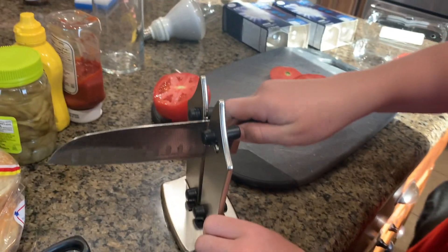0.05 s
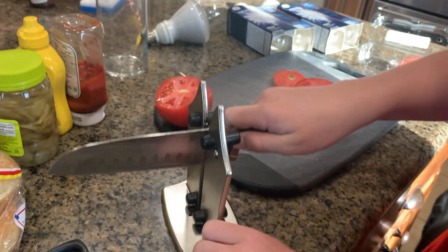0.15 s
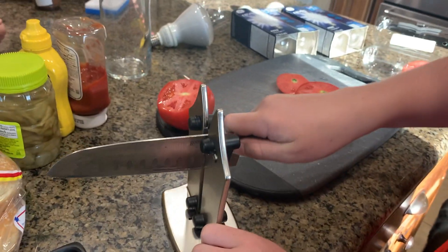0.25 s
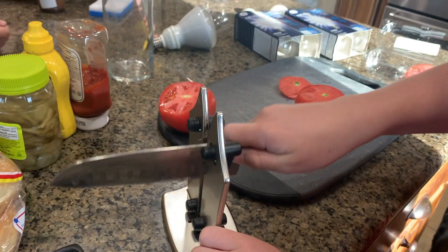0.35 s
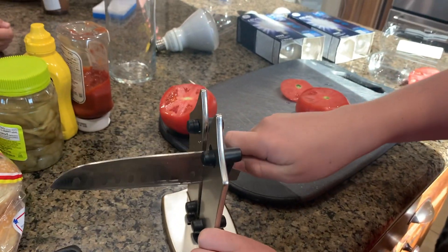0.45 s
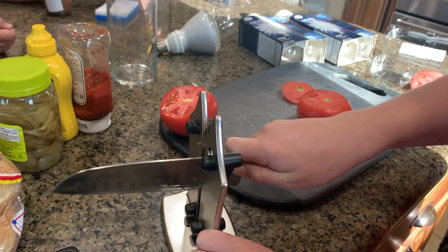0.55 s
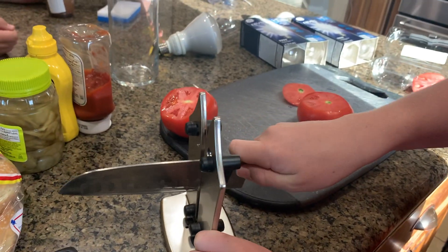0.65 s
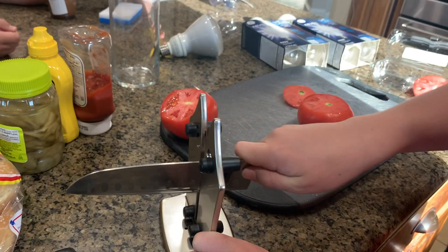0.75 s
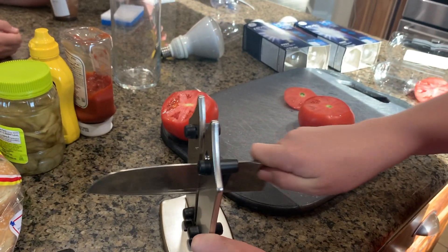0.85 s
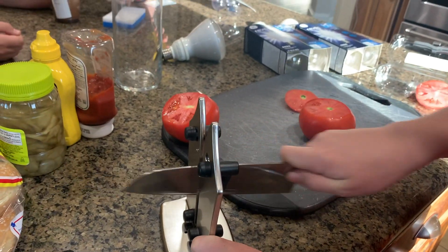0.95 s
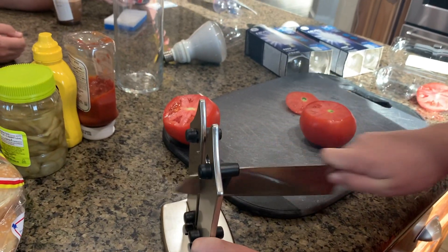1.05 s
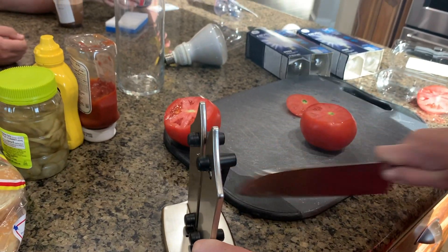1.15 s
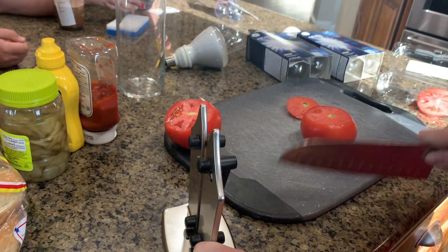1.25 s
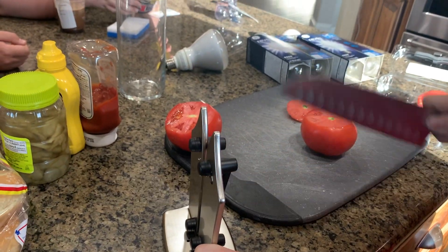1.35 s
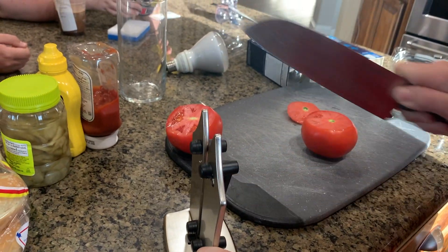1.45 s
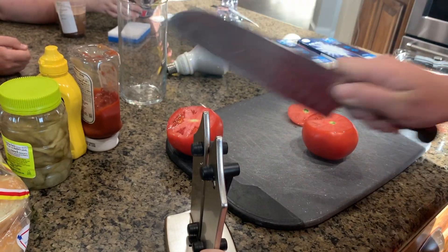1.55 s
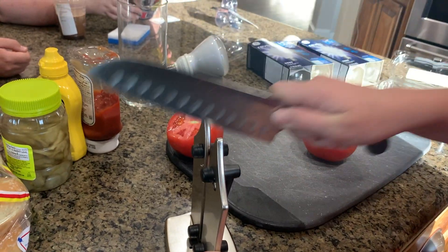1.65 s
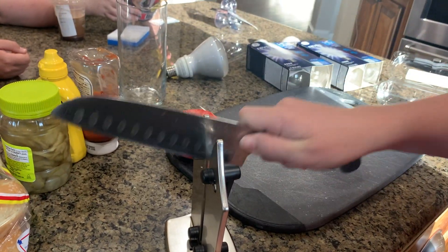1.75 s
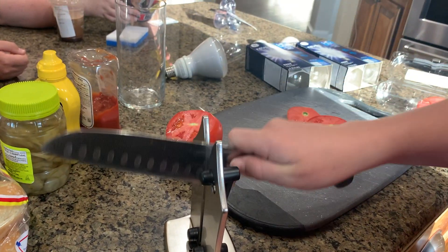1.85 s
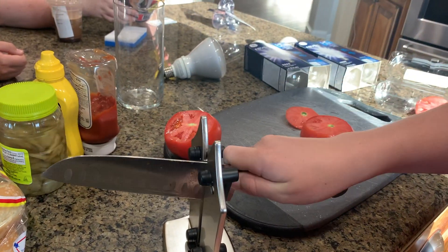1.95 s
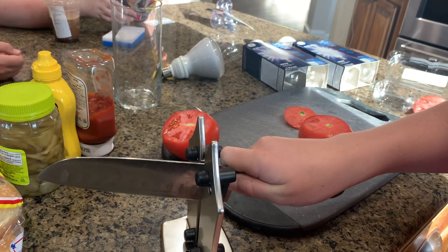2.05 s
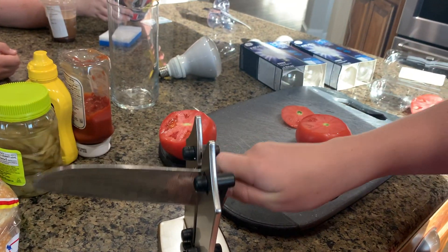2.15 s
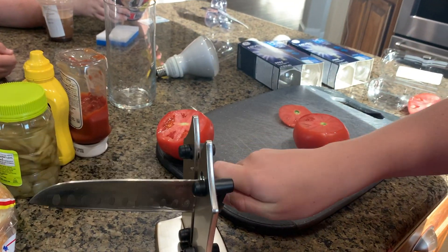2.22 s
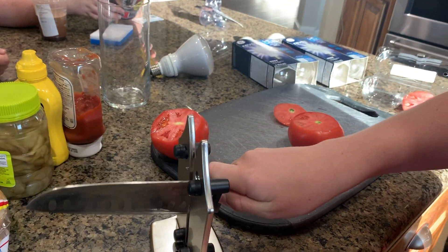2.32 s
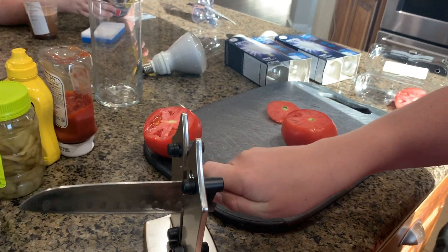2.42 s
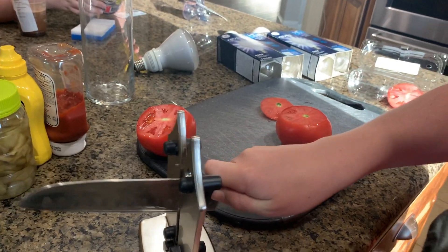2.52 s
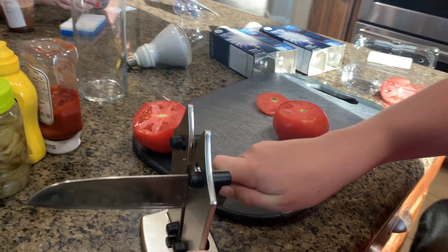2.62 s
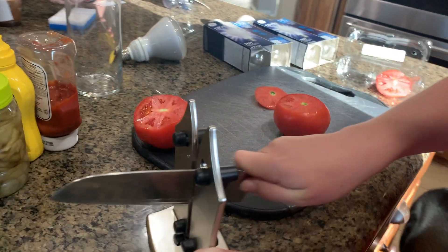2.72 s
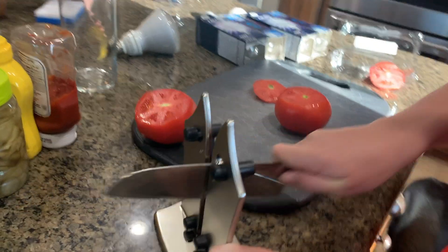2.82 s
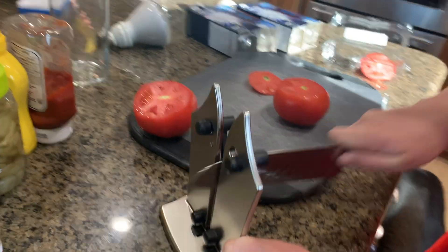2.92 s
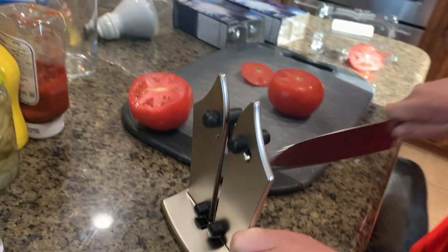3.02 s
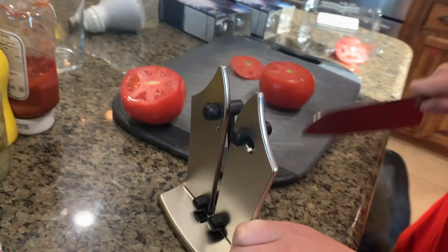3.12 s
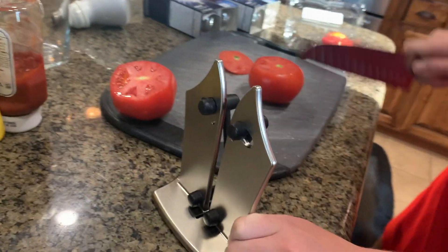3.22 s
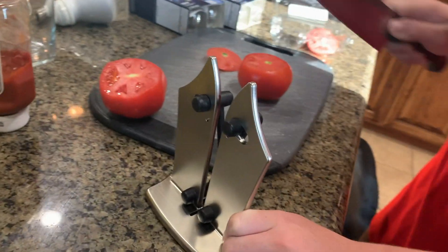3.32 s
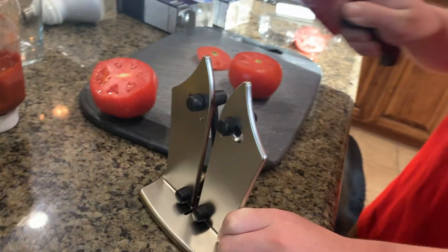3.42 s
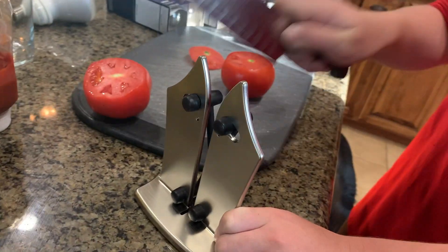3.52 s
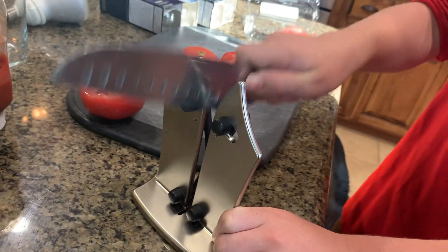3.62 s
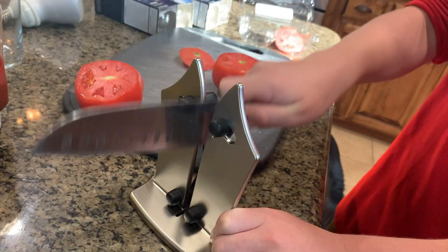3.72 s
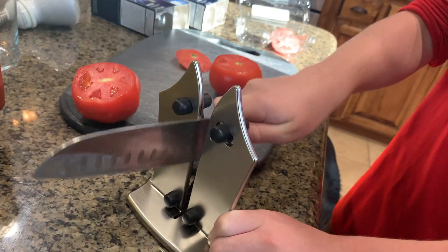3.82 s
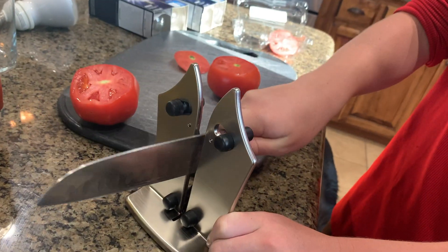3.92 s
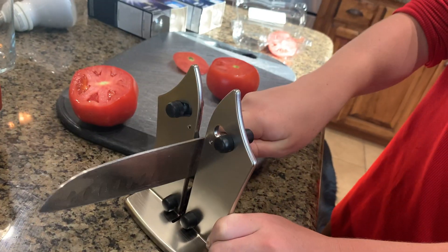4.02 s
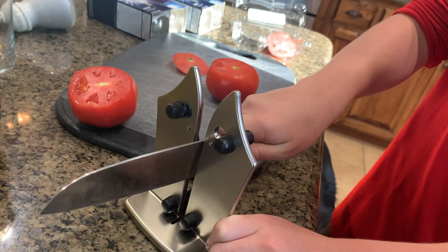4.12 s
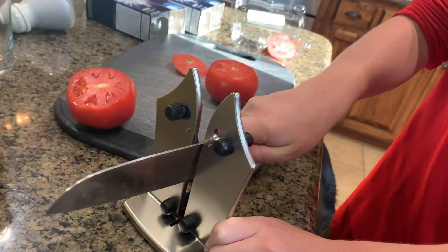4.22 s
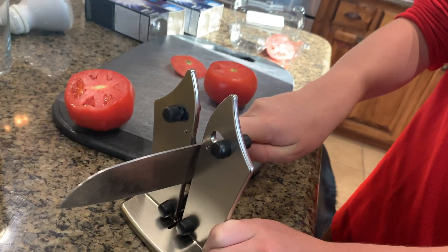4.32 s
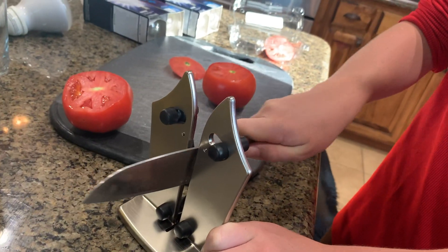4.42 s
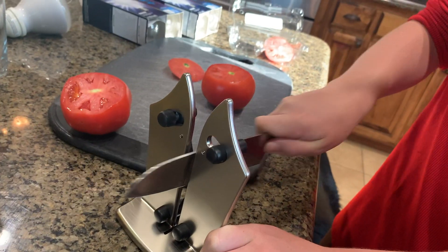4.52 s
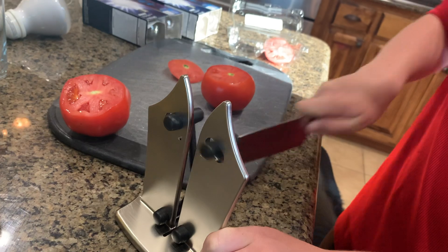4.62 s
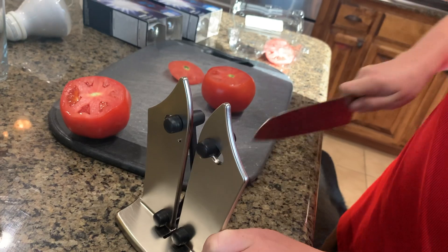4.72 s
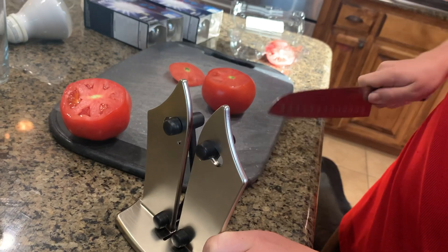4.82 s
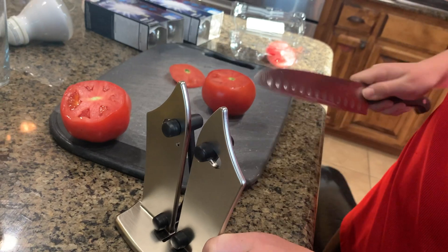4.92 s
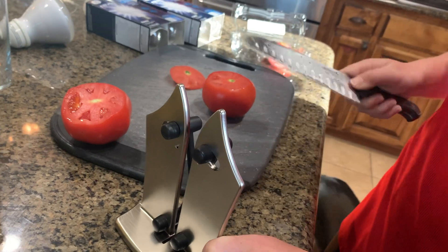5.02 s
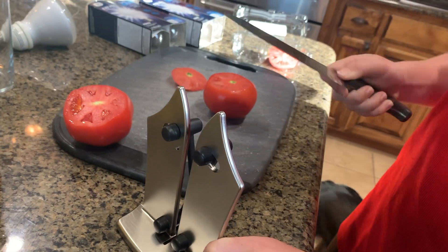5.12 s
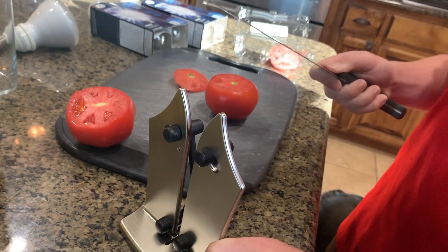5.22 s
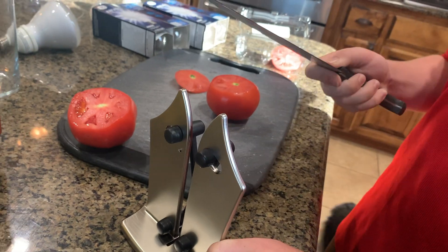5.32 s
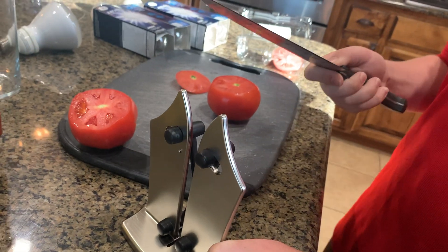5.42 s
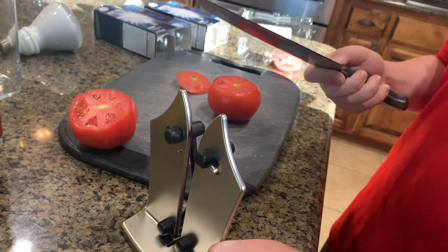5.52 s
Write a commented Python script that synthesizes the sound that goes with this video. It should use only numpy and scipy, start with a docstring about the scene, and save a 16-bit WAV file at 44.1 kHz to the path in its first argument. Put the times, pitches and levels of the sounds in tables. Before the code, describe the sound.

Close metallic clinks, three gritty scrapes that brighten toward the blade tip, and hard spring-jaw clacks in a humming, hard-walled kitchen.

```python
"""A hard-walled kitchen: a knife is drawn three times through a spring-armed countertop sharpener, close by.
Each time the blade clinks into the slot, slides down, grinds along the carbide jaws and lets them snap shut.
Rasp and rubbing are coloured streams of tiny slips; blows are short noisy bursts that ring metal modes.
An appliance hums behind, filtered noise with one tone that slowly grows; two microphone ports hear it all."""
import sys
import numpy as np
from scipy import signal
from scipy.fft import rfft, irfft
from scipy.io import wavfile
from scipy.ndimage import uniform_filter1d

SR = 44100
rng = np.random.default_rng(int(sys.argv[2]) if len(sys.argv) > 2 else 0)


def store_pcm(level_fs):
    """Save levels as 16-bit WAV."""
    pcm = np.round(np.clip(level_fs, -1, 1) * 32767).astype(np.int16)
    wavfile.write(sys.argv[1], SR, np.atleast_2d(pcm).T)


N = 245548
TIME = np.arange(N) / SR
BINS = np.fft.rfftfreq(N, 1 / SR)

# one draw of the knife, from the bite to the snap: (bite t/s, resting time before it/s,
# level at the bite/dB, level at the tip ahead of the point's swell/dB, added swell partway/dB,
# brightness at the bite/dB, brightness at the tip ahead of the point's hiss/dB,
# groan of the frame/dB, shudder of the base/dB)
PULLS = [(0.745, .2, -48.5, -32, 1, -4.5, 7.5, 1, -47.5),
         (2.635, .36, -49.5, -28.5, 0, -5.5, 11, 11.5, -42),
         (4.223, .08, -45.5, -33.5, 0, -10, 2.5, 11.5, -45)]
# the jaws clashing as the tip leaves them: (t/s, crack level ahead of the jaws' ring/dB, fading time/ms,
# time to the rebound/ms, change per rebound/dB, lower frame mode f/Hz, its level/dB,
# upper frame mode f/Hz, its level/dB, share of thud/dB, share of top sparkle/dB, share thrown into the room/dB)
SNAPS = [(1.1404, -6, 1.3, 4.5, -6, 1347, -26, 2310, -21.5, -42, -3.5, 0.5),
         (2.9961, -14.5, 1.86, 3.36, -7, 1490, -25.5, 1790, -20, -21.5, -15.5, -1.5),
         (4.6464, -8.5, 1.13, 2.4, 0.5, 1230, -12, 2070, -9.5, -26.5, -6, -1.5)]
# colour of the top sparkle of steel on steel: (f/Hz, relative level/dB)
SPARKLE = [(5000, -30.5), (9000, -1), (12700, -2.5), (15600, -9)]
# blade resonances are fainter at the heel: their share is this at the heel and this plus 1 at the tip
HEEL_RIPPLE = .35


def amp(db):
    """Decibels to amplitude."""
    return 10 ** (np.asarray(db) / 20)


def unit(x):
    """Scale to rms 1."""
    return x / np.sqrt(np.mean(x ** 2) + 1e-20)


def read(points, hz):
    """A spectrum, joined by straight lines over log frequency."""
    f, value = np.transpose(points)
    return np.interp(np.log(hz + 1), np.log(f + 1), value)


def add(mix, s, sound):
    """Lay a sound into the mix from time s on."""
    part = mix[round(s * SR):][:len(sound)]
    part += sound[:len(part)]


def drift(rate_hz):
    """Chance wandering of rms 1, mostly slower than the rate."""
    return unit(irfft(rfft(rng.standard_normal(N)) / (1 + (BINS / rate_hz) ** 4), N))


def swell(s, rise_s, fall_s):
    """A rounded rise to 1 at time s and a fall after it."""
    return np.exp(-((TIME - s) / np.where(TIME < s, rise_s, fall_s)) ** 2)


def colour(x, points, size=2048):
    """Causal filter with the shape of the given spectrum and a power gain of 1."""
    log_gain = np.log(amp(read(points, abs(np.fft.fftfreq(size, 1 / SR)))))
    taps = np.fft.ifft(np.exp(np.conj(signal.hilbert(log_gain)))).real
    return signal.oaconvolve(x, taps / np.linalg.norm(taps))[:N]


def burst(fade_ms, rise=.25, uneven_db=4.0):
    """Metal chattering on metal: an uneven rush of tiny contacts that swells quickly and dies away."""
    age = TIME[:SR // 12] * 10 ** 3 / fade_ms
    even = np.exp(-age) * (1 - np.exp(-age / rise)) * (1 + 2 * rise)
    clumps = unit(uniform_filter1d(rng.standard_normal(len(age)), size=24))
    clumped = even * amp(uneven_db * clumps)
    signs = rng.choice([-1., 1.], len(age))
    return signs * clumped * np.linalg.norm(even) / np.linalg.norm(clumped)  # clumping keeps the energy


def mode(hz, t60):
    """One dying vibration."""
    t = TIME[:SR // 2]
    return np.sin(2 * np.pi * hz * t) * np.exp(-np.log(1000) * t / t60)


def grains(per_s, spread_db, smooth):
    """Random micro-slips of uneven size over a smooth hiss."""
    size = amp(spread_db * np.minimum(rng.exponential(1, N), 4)) * rng.choice([-1., 1.], N)
    slips = unit(size * (rng.random(N) < per_s / SR))
    return unit(slips + smooth * rng.standard_normal(N))


def diffuse(a, b):
    """Two unrelated signals become a left-right pair with a chosen likeness per frequency."""
    # likeness of left and right: (f/Hz, likeness/0-1)
    alike = [(100, 0.98), (330, 0.91), (700, 0), (1500, 0.1), (3500, 0), (4700, 0.83), (9000, 1),
             (15000, 0.4)]
    same = np.clip(read(alike, BINS), 0, 1)
    a, b = rfft(a, N), rfft(b, N)
    return irfft(np.array([a, same * a + np.sqrt(1 - same ** 2) * b]), N)


def blade_ring():
    """The steel blade's answer to one blow: a sum of dying modes."""
    # ringing of the blade: (f/Hz, relative level/dB, t60/s)
    blade = [(1275, -7, .12), (4005, -14, .08), (4800, -12, .08), (5350, -13, .07), (6340, -10, .1),
             (7700, -8, .07), (8010, -5, .07), (8150, -4, .07), (9250, -2, .06), (11930, -6, .06),
             (12700, -2, .06), (13000, -3, .07), (14480, -10, .05), (15600, -9, .08)]
    return sum(amp(db) * mode(hz, t60) for hz, db, t60 in blade)


def through_jaws(x, ring_db=0.5, direct_db=0.5):
    """The sharpener's metal parts ring along with whatever shakes them."""
    # narrow resonances of jaws, arms and frame: (f/Hz, width/Hz, relative level/dB)
    jaws = [(1171, 77, -1), (1345, 52, -6), (1570, 60, -2.5), (2130, 53, -5), (2324, 50, -6.5),
            (2540, 190, 2), (3220, 110, -2.5), (3550, 100, -8), (5620, 86, 1), (5820, 160, 2),
            (6040, 36, 2), (6341, 60, -1), (7081, 110, 0.5), (7900, 400, -5.5), (9560, 500, 1.5),
            (10975, 110, 0.5), (11376, 90, -1), (13100, 500, -2.5)]
    ring = sum(amp(db) * signal.lfilter(*signal.iirpeak(hz, hz / width, fs=SR), x) for hz, width, db in jaws)
    return amp(direct_db) * x + amp(ring_db) * ring


def appliance(hum_db=-34.0, tone_hz=293.3, waver_hz=0.31, flutter_db=1.06, tone_side_db=6):
    """A fan's low rush, and one slightly wavering motor tone, from the left."""
    # colour of the rush: (f/Hz, relative level/dB)
    hum = [(25, -42), (45, -29), (105, -11.5), (165, -13.5), (185, -4.5), (200, -4), (216, 3), (238, -4.5),
           (252, -3.5), (275, -10), (330, -6), (375, -17.5), (450, -22.5), (600, -32.5), (1150, -32),
           (2200, -45.5), (3500, -54.5), (7000, -64), (15000, -71.5)]
    # the rush leans mostly to the left: (f/Hz, left minus right level/dB)
    hum_side = [(50, -1.5), (130, 4), (215, 3.5), (300, 5), (500, 3.5), (1000, -0.5)]
    tone_s, tone_db = [1.6, 3.44], [-41, -32.5]  # the tone grows once from soft to loud
    sides = np.array([[.5], [-.5]])
    noise = diffuse(*rng.standard_normal((2, N)))
    rush = rfft(noise) * amp(read(hum, BINS) + sides * read(hum_side, BINS))
    tone = np.sqrt(2) * np.sin(2 * np.pi * np.cumsum(tone_hz + waver_hz * drift(1.97)) / SR)
    level_db = np.interp(TIME, tone_s, tone_db) + flutter_db * drift(4.8)
    return amp(hum_db) * unit(irfft(rush, N)) + tone * amp(level_db + sides * tone_side_db)


def kitchen(sent, room_db=-12, near_db=-12, near_s=0.0088, build_s=0.0011):
    """Each direction takes its own paths: quick scatter off the counter and jars, then a tail dull at its end."""
    # the kitchen's reverberation: (f/Hz, t60/s)
    reverberation = [(300, 0.78), (1300, .68), (3500, 0.66), (5500, 0.6), (7500, .42), (10000, 0.31),
                     (15000, 0.21)]
    # strength of the reverberation: (f/Hz, relative level/dB)
    lively = [(300, 3.5), (950, 0), (1170, 6), (1600, 2), (2050, 5.5), (2650, 2), (3700, 2.5), (4800, -3),
              (7000, -1), (15000, 1.5)]
    hz, t, z = signal.stft(rng.standard_normal((len(sent), 2, SR)), SR, nperseg=512)
    decay = np.exp(-np.log(1000) * t / read(reverberation, hz)[:, None]) * (1 - np.exp(-t / build_s))
    tail = signal.istft(z * decay * amp(read(lively, hz))[:, None], SR, nperseg=512)[1][..., :SR]
    near = rng.standard_normal(tail.shape) * np.exp(-TIME[:SR] / near_s)
    echo = amp(room_db) * tail / np.linalg.norm(tail[:, 0])
    echo += amp(near_db) * near / np.linalg.norm(near[:, 0])
    return diffuse(*signal.fftconvolve(sent[:, None], echo, axes=2).sum(0)[:, :N])


def shudder():
    """The drag of the blade shakes the base against the counter, most just after the bite."""
    # colour of the shaking: (f/Hz, relative level/dB)
    rumble = [(25, -48), (45, -9.5), (60, 8), (80, -1.5), (120, -11.5), (300, -60.5)]
    # the base rocking on the counter as the load changes: (t/s, level/dB)
    thumps = [(1.18, -44), (2.58, -45), (3.8, -47)]
    thump_s = .04
    rise, lag_s, fall_s = 0.69, .03, 0.19  # the rise is a share of the resting time
    drag = sum(amp(db) * swell(bite + lag_s, rise * rest_s, fall_s) for bite, rest_s, *_, db in PULLS)
    rocking = sum(amp(db) * swell(s, thump_s, thump_s) for s, db in thumps)
    shaking = unit(irfft(rfft(rng.standard_normal(N)) * amp(read(rumble, BINS)), N))
    return shaking * (drag + rocking)


def handling():
    """Faint scratches as the grip on the lifted knife shifts."""
    # colour of the scratches: (f/Hz, relative level/dB)
    grip = [(2000, -26), (4500, -4), (6300, 3), (8000, -17), (12000, -24.5)]
    # the grip shifting: (t/s, level/dB)
    shifts = [(5.016, -62.5), (5.548, -65)]
    shift_s = .009
    touch = sum(amp(db) * swell(s, shift_s, shift_s) for s, db in shifts)
    return colour(grains(per_s=970, spread_db=3.5, smooth=.4) * touch, grip)


def sliding():
    """The flat of the blade brushes the guides: light rubbing whispers and sets the free blade singing."""
    # brushes: (loudest at t/s, swelling/s, fading/s, level/dB, share of blade ring/dB)
    slides = [(0.15, 0.019, 0.033, -60, -16), (0.346, 0.032, 0.044, -52, -8),
              (0.529, 0.061, 0.013, -58.5, -16.5), (1.96, 0.0092, 0.035, -70, -10),
              (2.2, 0.059, 0.017, -51.5, -12), (2.35, 0.025, 0.04, -59.5, -17),
              (3.769, 0.0036, 0.03, -45, -24), (3.871, 0.029, 0.043, -49, -1),
              (4.162, 0.013, 0.018, -56.5, -30.5)]
    # colour of the whisper: (f/Hz, relative level/dB)
    whisper = [(400, 3), (1250, 10.5), (2200, 5.5), (3300, -1.5), (4700, 7), (5800, 0.5), (7200, -11.5),
               (9300, 3), (11300, -4.5), (13000, -1.5), (14500, 0), (15600, -4)]
    rub = grains(per_s=700, spread_db=2.5, smooth=0.4)
    touch = np.array([amp(db) * swell(s, rise_s, fall_s) for s, rise_s, fall_s, db, _ in slides])
    singing = amp([row[-1] for row in slides]) @ touch
    ring = blade_ring()
    sung = signal.oaconvolve(rub * singing, ring / np.linalg.norm(ring))[:N]
    return colour(rub * touch.sum(0), whisper) + sung


def contacts():
    """Every blow of the blade as (s, level dB, fading time ms, shares in dB of knock, blade ring, sparkle)."""
    # the free blade striking the steel guides as it drops into the slot:
    # (t/s, level ahead of the jaws' ring/dB, fading time/ms, share of blade ring/dB)
    landings = [(0.161, -55, 3.2, -9), (1.923, -38.5, 7.6, -9), (1.93, -39, 7, 1.5), (1.9523, -41, 2, -8),
                (3.749, -37.5, 6, -5.5), (3.76, -28, 2, -3.5)]
    # the held edge catching on the jaws:
    # (t/s, level ahead of the jaws' ring/dB, share of the frame's knock/dB, share of top sparkle/dB)
    catches = [(0.5203, -49, -11.5, -18), (0.5464, -45, -18, -20), (0.729, -43.5, 9, -7),
               (0.839, -30, -1.5, 1), (0.875, -38, -15, 3), (0.946, -37.5, -8, -7),
               (2.2149, -51.5, 13.5, -13), (2.266, -53.5, -4, -22), (2.349, -48.5, -19, -16),
               (2.378, -42.5, -20, -20), (2.456, -47.5, 8, -2), (2.492, -48.5, 4.5, -13),
               (2.528, -48.5, 8, -15), (2.537, -40, 11.5, -2), (2.57, -42, 3, -22), (2.631, -43, 10, -9),
               (2.66, -34, 1.5, 2), (2.677, -39.5, 6, -5), (2.707, -31, -6.5, -10),
               (2.9309, -28.5, -5.5, 7), (3.9174, -58.5, 16, -19), (4.168, -35.5, -14, -6.5),
               (4.182, -42, -17.5, -14), (4.219, -44, -0.5, -12), (4.227, -40.5, -6, -13.5),
               (4.283, -38.5, -0.5, -14.5), (4.385, -33.5, -6.5, -14), (4.396, -28, -11.5, -6),
               (4.468, -36.5, -8.5, -5), (4.586, -37, -1.5, 10.5)]
    landing_knock_db, landing_sparkle_db, held_ring_db = -4, 2.5, -26.0
    catch_ms, growth_per_db = 2.7, .03  # a blunt catch, with more knock, also lasts longer
    lead_s, lead_db = 0.0046, -10  # a softer touch leads into each catch: how early, share of the catch
    # faint random ticks while the edge settles between the jaws
    settle_gap_s, settle_db, settle_spread_db, settle_ms = .014, -59, 6, 1.0
    settle_shares_db = 5.5, held_ring_db, -28

    blows = [(s, db, fade_ms, landing_knock_db, ring_db, landing_sparkle_db)
             for s, db, fade_ms, ring_db in landings]
    for s, db, knock_db, sparkle_db in catches:
        fade_ms = catch_ms * np.exp(growth_per_db * knock_db)
        shape = fade_ms, knock_db, held_ring_db, sparkle_db
        blows += [(s - lead_s, db + lead_db, *shape), (s, db, *shape)]
    for bite, rest_s, *_ in PULLS:
        starts = np.arange(bite - rest_s, bite, settle_gap_s)
        for s, (late, size) in zip(starts, rng.random((40, 2))):
            db = settle_db + settle_spread_db * (2 * size - 1)
            blows.append((s + late * settle_gap_s, db, settle_ms, *settle_shares_db))
    return blows


def clinks(blows):
    """Each contact gives a tick, some steel sparkle, a knock of the frame and some ring of the blade."""
    # colours of tick and knock: (f/Hz, relative level/dB)
    tick_colour = [(400, -26), (2000, -22.5), (4000, -0.5), (5800, 5), (7500, -2.5), (9200, -2.5),
                   (10800, -8.5), (12700, -22.5), (15600, -23)]
    knock_colour = [(200, -29.5), (600, -6.5), (950, -4), (1270, 3), (1750, -1), (2300, -6.5), (3200, -4.5),
                    (4500, -7), (9000, -36)]
    tick, sparkle, knock, ring = np.zeros((4, N))
    steel = blade_ring()
    for s, db, fade_ms, knock_db, ring_db, sparkle_db in blows:
        add(tick, s, amp(db) * burst(fade_ms, rise=.4))
        add(sparkle, s, amp(db + sparkle_db) * burst(fade_ms, rise=0.31))
        add(knock, s, amp(db + knock_db) * burst(fade_ms, rise=0.39))
        add(ring, s, amp(db + ring_db) * steel)
    struck = colour(tick, tick_colour) + colour(knock, knock_colour)
    return through_jaws(struck, ring_db=-5.5, direct_db=-1.5) + colour(sparkle, SPARKLE) + ring


def squeals():
    """The edge locks onto one resonance of the jaws for a moment: a narrow band of noise around it."""
    # squeals: (t/s, half length/s, f/Hz, level/dB)
    locks = [(0.685, 0.012, 2720, -47.5), (0.733, 0.012, 2630, -43), (0.784, 0.013, 2670, -48.5),
             (2.93, 0.059, 1320, -48), (4.54, 0.023, 1363, -42), (4.553, 0.057, 2590, -45),
             (4.589, 0.01, 1210, -41)]
    width_hz = 32
    total = np.zeros(N)
    for s, half_s, hz, db in locks:
        phase = 2 * np.pi * hz * TIME
        tone = drift(width_hz) * np.cos(phase) + drift(width_hz) * np.sin(phase)
        total += amp(db) * swell(s, half_s, half_s) * tone
    return total


def stroke():
    """The pulls as controls: level and brightness change along the blade, the groan passes with the heel."""
    # the edge digging in for a moment: (t/s, half length/s, added rasp level/dB)
    digs = [(0.662, 0.028, -54), (0.79, 0.014, -48.5), (1.124, 0.0037, -36), (2.649, 0.014, -42.5),
            (2.672, 0.012, -40), (2.714, 0.014, -42), (4.222, 0.0045, -44), (4.287, 0.0062, -38.5),
            (4.394, 0.0083, -44.5), (4.592, 0.0082, -33.5)]
    # before the bite the edge only rests on the jaws: this much quieter, and growing
    resting_db, resting_db_per_s, bite_s = -11, 40.5, 0.019
    speed_power = 1  # the blade speeds up as this power of the way through the pull
    # a slight added swell partway through a pull: where and how wide (shares of the pull)
    partway_at, partway_width = 0.67, 0.058
    # the frame groans while the heel bears down (shares of the pull), over this bass without it
    groan_at, groan_width, unloaded_db = 0.25, 0.34, -3
    # at the curved point the rasp swells into the snap (part added, relative to the rasp) and hisses brighter
    point_db, point_s, point_bright_db, point_bright_s = -0.5, 0.018, 7.5, 0.1

    gain, bright_db, groan_db, travel = np.zeros((4, N))
    for pull, (leave, *_) in zip(PULLS, SNAPS):
        bite, rest_s, bite_db, tip_db, swell_db, bite_bright, tip_bright, groan, _ = pull
        way = np.clip((TIME - bite) / (leave - bite), 0, 1)
        speed = way ** speed_power
        held = (TIME >= bite - rest_s) & (TIME <= leave)
        rest_db = resting_db * np.clip((bite - TIME) / bite_s, 0, 1)
        rest_db -= resting_db_per_s * np.maximum(bite - TIME, 0)
        partway_db = swell_db * np.exp(-((way - partway_at) / partway_width) ** 2)
        point = 1 + amp(point_db) * swell(leave, point_s, point_s)
        gain += held * amp(bite_db + (tip_db - bite_db) * way + partway_db + rest_db) * point
        hiss_db = point_bright_db * swell(leave, point_bright_s, point_bright_s)
        bright_db += held * (bite_bright + (tip_bright - bite_bright) * speed + hiss_db)
        groan_db += held * (unloaded_db + groan * np.exp(-((way - groan_at) / groan_width) ** 2))
        travel += held * way * speed
    gain += sum(amp(db) * swell(s, half_s, half_s) for s, half_s, db in digs)
    return gain, bright_db, groan_db, travel


def blade_spans(hz, travel):
    """Bending waves stand on both sides of the jaws: handle-side modes fall, tip-side modes rise (dB)."""
    # how far the gliding modes stand out, ahead of the heel-to-tip share: (f/Hz, depth/dB)
    glide_depth = [(900, .8), (3000, 1.4), (7000, 2.3), (15000, 1.6)]
    # where the jaws sit at the start and end of a pull (shares of the blade's length)
    lowest_hz, heel_share, tip_share, tip_side = 48, .5, .88, .6
    order = np.sqrt(hz / lowest_hz)[:, None]
    behind = heel_share + (tip_share - heel_share) * travel
    falling = np.cos(2 * np.pi * order * behind)
    rising = np.cos(2 * np.pi * order * (1 - behind))
    return read(glide_depth, hz)[:, None] * (HEEL_RIPPLE + travel ** 2) * (falling + tip_side * rising)


def grinding(loudness, bright_db, groan_db, travel, chatter_db=1.6, chatter_hz=160):
    """Carbide shaves the edge in countless slips: a dull rasp at the heel, a brighter hiss toward the tip."""
    # colour of the rasp: (f/Hz, relative level/dB)
    rasp_colour = [(250, -28), (550, -4), (750, -2.5), (950, 0.5), (1250, 2), (1900, -8), (2650, -4),
                   (3400, -3), (4300, -7), (5800, -9.5), (7500, -10.5), (9500, -11), (12500, -17.5),
                   (15500, -16.5)]
    # bands that open along the pull, and those that groan: (f/Hz, share of the control)
    bright_share = [(1300, 0.06), (2800, 0.065), (4500, .35), (6500, 0.79), (10000, 0.95), (15000, 1.47)]
    groan_share = [(800, 1), (1300, 0)]
    # how far resonances flare at random, ahead of the heel-to-tip share: (f/Hz, depth/dB)
    flare_depth = [(1200, 1.5), (4000, 2.8), (10000, 4)]
    # slower random holds, all along the pull: (f/Hz, depth/dB)
    hold_depth = [(600, 2.6), (1200, 3.4), (3500, 3.5), (6000, 2.4), (12000, 2)]

    slips = grains(per_s=2800, spread_db=1.5, smooth=0.58) * amp(chatter_db * drift(chatter_hz))
    hz, t, z = signal.stft(colour(slips, rasp_colour), SR, nperseg=512, noverlap=384)
    way = np.interp(t, TIME, travel)
    shade_db = np.outer(read(bright_share, hz), np.interp(t, TIME, bright_db))
    shade_db += np.outer(read(groan_share, hz), np.interp(t, TIME, groan_db))
    # resonances of the blade flare for an instant, most of all near the thin tip
    flares = uniform_filter1d(rng.standard_normal(z.shape), size=2, axis=0)
    flares = unit(uniform_filter1d(flares, size=6, axis=1))
    holds = unit(uniform_filter1d(rng.standard_normal(z.shape), size=12, axis=1))
    shade_db += holds * read(hold_depth, hz)[:, None]
    shade_db += flares * read(flare_depth, hz)[:, None] * (HEEL_RIPPLE + way ** 2)
    gain = amp(shade_db + blade_spans(hz, way))
    power = amp(read(rasp_colour, hz))[:, None] ** 2
    gain = gain / np.sqrt((power * gain ** 2).sum(0) / power.sum())  # colour changes, loudness stays
    rasp = signal.istft(z * gain, SR, nperseg=512, noverlap=384)[1][:N]
    return unit(through_jaws(rasp)) * loudness


def snaps(in_room):
    """The sprung jaws slam, rebound and rattle; the frame rings briefly and the freed steel lingers faintly."""
    # colours of crack and thud: (f/Hz, relative level/dB)
    crack_colour = [(200, -33), (700, -27.5), (1050, -15.5), (1400, -1), (2800, -3.5), (4300, 3.5),
                    (5600, 4.5), (7300, -0.5), (9300, 4), (12000, -5), (15600, -11)]
    thud_colour = [(200, -14.5), (430, 1), (700, -7), (1000, -4), (2000, -25), (6000, -46.5)]
    # the freed blade and arms ring on faintly: (f/Hz, level/dB, t60/s)
    lingering = [(1146, -55, 0.47), (1980, -60.5, .5), (2850, -62, 0.36), (4200, -57.5, .4),
                 (13900, -61.5, .3)]
    # the tip grazes the jaws just before they meet; the frame answers just after
    graze_s, graze_db, graze_ms, frame_lag_s = 0.0039, -13.5, 3.5, 0.002086
    # the jaws rattle once more as they settle: how late, share of the crack, fading time
    rattle_s, rattle_db, rattle_ms = .008, -13.5, 4.5
    frame_room_db = -5.5  # the flat frame rings mostly toward the microphones, less into the room
    arm_hz, arm_db = 4020, -9  # the spring arms ring with every snap, at a share of the crack
    lower_t60, upper_t60, arm_t60 = .028, .02, .012

    crack, thud, sparkle, frame = np.zeros((4, N))
    linger = sum(amp(db) * mode(hz, t60) for hz, db, t60 in lingering)
    for snap in SNAPS:
        s, db, fade_ms, rebound_ms, loss_db, lower_hz, lower_db, upper_hz, upper_db, *shares_db = snap
        thud_db, sparkle_db, room_db = shares_db
        blows = [(s - graze_s, graze_db, graze_ms), (s + rattle_s, rattle_db, rattle_ms)]
        blows += [(s + k * rebound_ms / 10 ** 3, k * loss_db, fade_ms) for k in range(2)]
        for at, blow_db, blow_ms in blows:
            for part, share_db in (crack, 0), (thud, thud_db), (sparkle, sparkle_db):
                level = amp(db + blow_db + share_db + in_room * room_db)
                add(part, at, level * burst(blow_ms, rise=0.3, uneven_db=1.5))
        ring = amp(lower_db) * mode(lower_hz, lower_t60)
        ring += amp(upper_db) * mode(upper_hz, upper_t60)
        ring += amp(db + arm_db) * mode(arm_hz, arm_t60)
        add(frame, s + frame_lag_s, amp(in_room * (room_db + frame_room_db)) * ring + linger)
    cracked = through_jaws(colour(crack, crack_colour), ring_db=-15.0, direct_db=2.0)
    return cracked + colour(thud, thud_colour) + colour(sparkle, SPARKLE) + frame


def knife(rubbing, blows, in_room):
    """All that blade and sharpener radiate in one direction; the blows' fine grain differs by direction."""
    return rubbing + clinks(blows) + snaps(in_room)


def scene():
    """The knife heard directly and through the kitchen, over the hum and the shaking counter."""
    rubbing = grinding(*stroke()) + squeals() + sliding() + handling()
    blows = contacts()
    sent = np.array([knife(rubbing, blows, True) for _ in range(4)])
    return knife(rubbing, blows, False) + kitchen(sent) + appliance() + shudder()


def record(dry):
    """Two microphone ports: the right lags, its phase turned above the bass; peaks clip; then a band limit."""
    lag_s, ceiling, edge_hz = .000232, .85, 15880
    # phase turn in radians over Hz
    turn = np.interp(BINS, [0, 400, 650, 1300, 2200, 2800], [0, .8, 2.5, 2.5, 2.9, 3.72])
    right = irfft(rfft(dry[1]) * np.exp(-1j * (2 * np.pi * BINS * lag_s - turn)), N)
    clipped = np.clip([dry[0], right], -ceiling, ceiling)
    lowpass = signal.firwin(1023, edge_hz, window=("kaiser", 9), fs=SR)
    return signal.oaconvolve(clipped, lowpass[None], "same", axes=1)


dry = scene()
out = record(dry)
store_pcm(out)
```